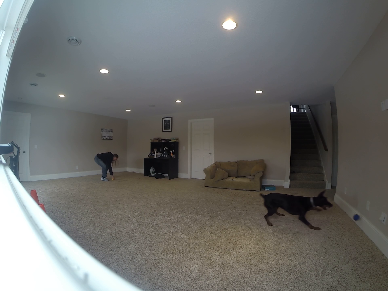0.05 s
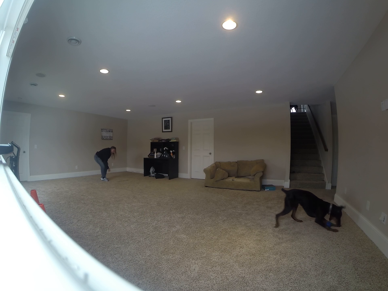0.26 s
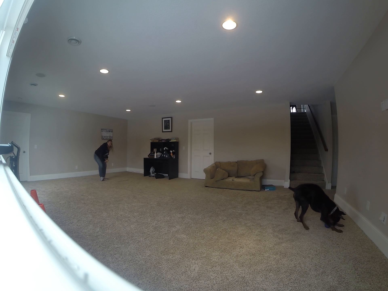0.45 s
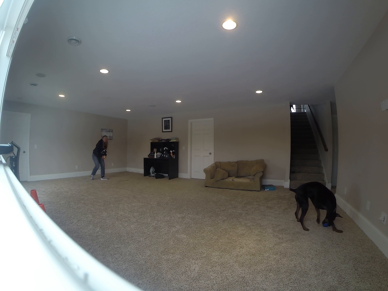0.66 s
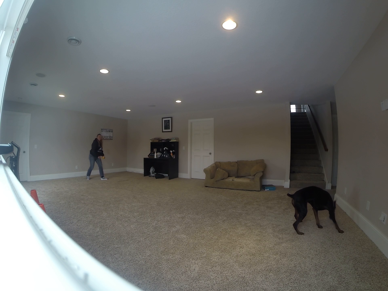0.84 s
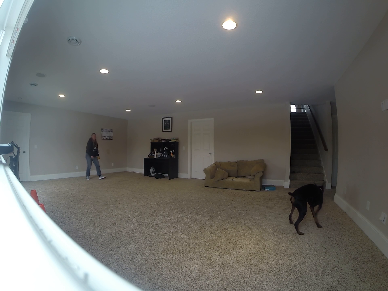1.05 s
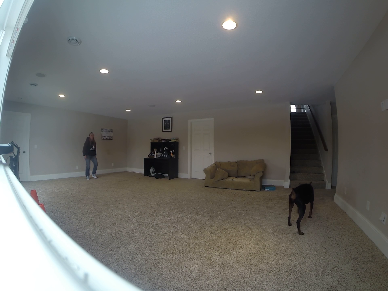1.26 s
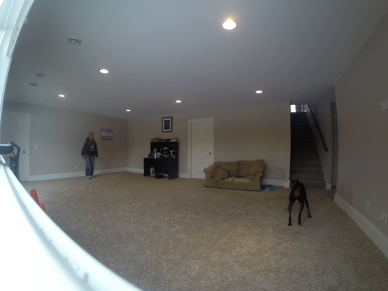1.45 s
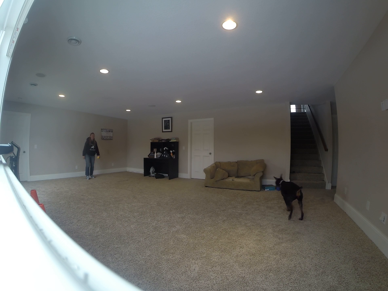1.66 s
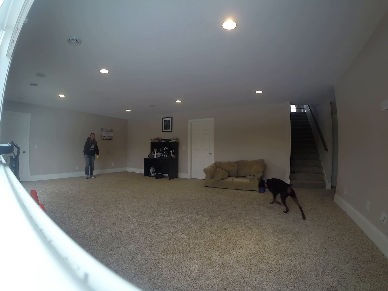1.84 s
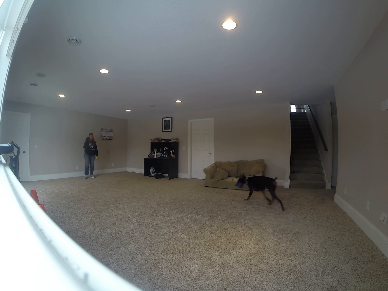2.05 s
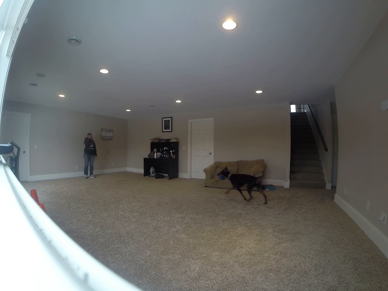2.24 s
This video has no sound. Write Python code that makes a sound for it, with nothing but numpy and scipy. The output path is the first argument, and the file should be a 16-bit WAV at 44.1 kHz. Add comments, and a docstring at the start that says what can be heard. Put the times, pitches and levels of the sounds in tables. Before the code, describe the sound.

In a quiet basement, a ball hits the wall with one loud, briefly echoing thump. A dog's paws slide over the carpet, thud to a stop, then pad away with light scuffs and faint ticks.

```python
"""A dog chases a ball

A thrown rubber ball slaps a hollow basement wall, which booms; the far walls throw the boom back.
A dog skids after it over the carpet, lands with a duller thud, then trots off on soft paws,
with a few faint ticks from its claws or collar. The room is quiet otherwise."""
import sys
import numpy as np
from scipy import signal
from scipy.fft import rfft, irfft, next_fast_len
from scipy.io import wavfile
from scipy.ndimage import uniform_filter1d, minimum_filter1d

SR = 44100
rng = np.random.default_rng(int(sys.argv[2]) if len(sys.argv) > 2 else 0)


def to_wav(sig):
    """Store sig (one row per channel, or 1-D mono) as 16-bit WAV at the path in sys.argv[1].

    Samples outside -1..1 are clipped; the rate is SR.
    """
    pcm = np.clip(np.atleast_2d(sig), -1, 1) * 32767
    pcm = np.round(pcm).astype(np.int16)
    wavfile.write(sys.argv[1], SR, pcm.T)  # frames by channels


N = 101429

# A colour says how strong a noise is from low to high. Each row: frequency in Hz, relative level in dB.
ROOM_COLOUR = [(15, -17), (25, 7.5), (167, -2), (309, -10), (488, -9.5), (1030, -17.5), (1150, -16.5),
               (1760, -21.5), (1910, -19), (2240, -20.5), (2930, -21), (4040, -23.5), (10900, -36.5),
               (13800, -40.5), (15000, -37)]  # the still room
SCUFF_COLOUR = [(50, -11), (200, -3.5), (400, 3), (680, 0.5), (800, -1.5), (920, -0.5), (1300, -1.5),
                (1520, -6.5), (1800, -5), (2300, -15), (3300, -12), (4000, -18), (4450, -19.5),
                (5200, -19.5), (7000, -27), (10000, -31.5), (15000, -47)]  # a paw brushing the carpet
SKID_COLOUR = [(35, -59.5), (60, -21.5), (97, -18), (135, -8), (174, -7), (251, 0.5), (339, -1), (381, -1),
               (577, -5), (744, -2.5), (1240, -13), (1330, -10.5), (1420, -17), (1830, -13.5),
               (2310, -23.5), (3420, -21.5), (15000, -56.5)]  # paws ploughing through the carpet
FIBRE_COLOUR = [(1500, -19), (3300, 6), (7000, -3.5), (11000, -12.5), (15000, -25)]  # bristling carpet fibres
THUD_COLOUR = [(22, -23), (33, -12), (47, -2.5), (62, -2.5), (100, -0.5), (180, -2), (300, -0.5), (400, -7),
               (550, -19.5), (900, -23.5), (2000, -70), (5000, -65.5)]  # the floor under the dog's weight
SLAP_COLOUR = [(300, -8), (1000, 3), (1400, -3), (2200, -26), (2800, 4.5), (3900, 0), (5000, -11.5),
               (8000, -18), (14000, -38)]  # rubber hitting the wall
BOOM_TAIL_COLOUR = [(25, -32), (45, -6.5), (110, 5), (200, 5), (340, -2.5), (480, -5.5), (700, -22),
                    (1200, -38), (2500, -68)]  # the boom lingering in the room

# Claw or collar ticks. Each row: start in seconds, level in dB, pitch in Hz, metallic ping level in dB.
CLAW_TICKS = [(0.612, -46.5, 3860, -68), (1.037, -50, 2820, -55), (1.22, -51, 3520, -64),
              (1.264, -59, 4200, -67), (1.2845, -54.5, 5000, -53.5), (1.649, -53, 3370, -53.5)]
# Paws brush the carpet. Each row: peak time in seconds, level in dB, rise in seconds,
# fade in seconds, treble boost in dB. A fade is always the time a sound takes to drop by 60 dB.
PAW_SCUFFS = [(0.333, -39.5, 0.03, 0.32, -2.5), (.39, -39.5, .06, 0.55, -5),
              (0.594, -53.5, 0.035, 0.53, -1), (.825, -59, 0.075, .3, 8), (0.884, -53.5, 0.074, 0.98, 2),
              (1.15, -55.5, 0.032, 0.33, -10), (1.23, -59.5, 0.052, 0.87, 6), (1.5, -64.5, 0.074, 0.47, -6),
              (1.722, -59, 0.065, 0.79, 7), (1.907, -54, 0.059, 0.68, 7), (2.13, -59, 0.06, 1, 6),
              (2.3, -56, 0.0092, .3, -17)]
# The skid swells and dies away. Each row: time in seconds, level in dB.
SKID_LEVELS = [(0, -34), (.03, -33.5), (.065, -31), (.11, -34.5), (.15, -33.5), (.2, -38.5), (.29, -40.5),
               (.45, -52), (.6, -63), (.7, -110)]
# The dog's footfalls. Each row: start in seconds, level in dB, fade in seconds, bass boost in dB.
PAW_THUDS = [(0.316, -17, 0.3, 3), (0.371, -27, 0.14, -38), (0.431, -30.5, 0.21, -14.5),
             (0.514, -42.5, 0.72, 9.5), (0.717, -48.5, .3, 24), (0.798, -52, 0.22, 17),
             (0.939, -71, 0.18, 12), (1.135, -52.5, 0.72, 0), (1.195, -55, 0.25, 9), (1.414, -57, 0.11, 2),
             (1.474, -51.5, 0.18, 2), (1.705, -55.5, 0.31, 15), (1.915, -52, 0.4, 13), (2.14, -46, 0.2, 12)]
# The ball's slap on the wall: three quick smacks heard as one.
# Each row: delay from the hit in seconds, level in dB.
BALL_SLAPS = [(-.0004, -24), (.0052, -22), (.018, -31)]
# Tones of the air inside the ball. Each row: pitch in Hz, level in dB, fade in seconds.
BALL_AIR_TONES = [(1270, -19.5, 0.032), (1396, -29, 0.041)]
# Tones of the hollow wall. Each row: pitch in Hz, relative level in dB, fade in seconds.
WALL_TONES = [(46.15, -40.5, 1), (57.1, -26.5, 0.81), (98.35, -16.5, 0.48), (147.6, -6, .2),
              (165.8, -4.5, .16), (184.6, -1, 0.11), (245.3, -16.5, 0.22), (302.2, -17, 0.26),
              (319.6, -5, 0.077)]
# The room throws the boom back. Each row: delay in seconds, level in dB compared with the direct boom.
ROOM_ECHOES = [(0.0117, -8), (0.0342, -10.5), (0.0596, -6.5), (0.105, -10)]

BALL_HIT_S = .136
CARPET_GRAIN_DB, GRAINS_PER_S = 1, 230  # the carpet catches and lets go


def amp(db):
    """Turn decibels into a number to multiply a sound by."""
    return 10 ** (np.asarray(db) / 20)


def clock():
    """The time of every sample, in seconds."""
    return np.arange(N) / SR


def filtered(x, gain_at):
    """Scale each frequency in x by gain_at(frequency in Hz)."""
    size = next_fast_len(N + 8192)
    return irfft(rfft(x, size) * gain_at(np.fft.rfftfreq(size, 1 / SR)), size)[:N]


def noise(colour, grain_db=0):
    """Noise of strength 1 in the given colour; grain_db makes its level flutter."""
    hz, db = np.transpose(colour)
    flutter = np.interp(clock() * GRAINS_PER_S, np.arange(N), rng.standard_normal(N))
    hiss = amp(grain_db * flutter) * rng.standard_normal(N)
    x = filtered(hiss, lambda f: amp(np.interp(np.log(f + 1), np.log(hz), db)))
    return x / x.std()


def boosted(colour, db, corner_hz, treble):
    """A colour with its treble or its bass raised by db (lowered if db is negative)."""
    hz, level = np.transpose(colour)
    treble_share = 1 / (1 + (corner_hz / hz) ** 4)
    return np.column_stack([hz, level + db * (treble_share if treble else 1 - treble_share)])


def struck(start, rise_s, fade_s):
    """The loudness of a blow over time: it rises quickly, then dies away."""
    age = np.maximum(clock() - start, 0)
    return (1 - np.exp(-age / rise_s)) * amp(-60 * age / fade_s)


def ring(tones, start, rise_s):
    """Pure tones that start together, each fading at its own speed."""
    return sum(amp(db) * struck(start, rise_s, fade_s) * np.sin(2 * np.pi * hz * (clock() - start))
               for hz, db, fade_s in tones)


def still_room():
    """The quiet room gives a faint, steady rumble and hiss."""
    return amp(-56) * noise(ROOM_COLOUR)


def claw_ticks():
    """Claws or collar make tiny hard clicks, each with a short ping and a faint tail in the room."""
    out = np.zeros(N)
    width = 2 ** 0.78  # 0.78 octaves to each side of the pitch
    for start, db, hz, ping_db in CLAW_TICKS:
        colour = [(hz / 4, -30), (hz / width, -10), (hz, 0), (hz * width, -10), (hz * 4, -25)]
        click = struck(start, rise_s=0.00082, fade_s=0.012)
        tail = amp(-21) * struck(start, rise_s=0.0035, fade_s=.35)
        ping = ring([(hz, ping_db, 0.028)], start, rise_s=0.00082)
        out += amp(db) * (click + tail) * noise(colour) + ping
    return out


def paw_scuffs():
    """Each paw brushes the carpet with a swish that swells, then fades into the room."""
    t, out = clock(), np.zeros(N)
    for peak_s, db, rise_s, fade_s, treble_db in PAW_SCUFFS:
        swell = np.exp(-(np.minimum(t - peak_s, 0) / rise_s) ** 2)
        fade = amp(-60 * np.maximum(t - peak_s, 0) / fade_s)
        colour = boosted(SCUFF_COLOUR, treble_db, corner_hz=2200, treble=True)
        out += amp(db) * swell * fade * noise(colour, CARPET_GRAIN_DB)
    return out


def paw_skid():
    """Braking paws rush over the carpet; its fibres hiss most at the start, while the paws are fast."""
    level_db = np.interp(clock(), *np.transpose(SKID_LEVELS))
    rush = amp(level_db) * noise(SKID_COLOUR, CARPET_GRAIN_DB)
    fibres = amp(-45) * struck(0, rise_s=0.0015, fade_s=0.62) * noise(FIBRE_COLOUR, CARPET_GRAIN_DB)
    return rush + fibres


def paw_thuds():
    """The dog's weight comes down on the carpeted floor in dull thuds that die away in the room."""
    out = np.zeros(N)
    for start, db, fade_s, bass_db in PAW_THUDS:
        colour = boosted(THUD_COLOUR, bass_db, corner_hz=170, treble=False)
        out += amp(db) * struck(start, rise_s=0.0039, fade_s=fade_s) * noise(colour)
    return out


def ball_slap():
    """Rubber smacks the painted wall, and the air in the ball pings just after."""
    smack = sum(amp(db) * struck(BALL_HIT_S + delay, rise_s=0.00089, fade_s=0.011)
                for delay, db in BALL_SLAPS)
    ping = ring(BALL_AIR_TONES, BALL_HIT_S + 0.00368, rise_s=0.0011)
    return smack * noise(SLAP_COLOUR) + ping


def wall_boom():
    """The hit makes the hollow wall ring low; echoes and a rumbling tail follow."""
    t = clock()
    direct = ring(WALL_TONES, BALL_HIT_S, rise_s=0.0069)
    echoes = sum(amp(db) * np.interp(t - delay, t, direct) for delay, db in ROOM_ECHOES)
    tail = amp(-18.5) * struck(BALL_HIT_S, rise_s=0.02, fade_s=0.61) * noise(BOOM_TAIL_COLOUR)
    return amp(2) * (direct + echoes + tail)


def scene():
    """Add the ball, the dog and the still room into one channel."""
    ball = wall_boom() + ball_slap()
    dog = paw_thuds() + paw_skid() + paw_scuffs() + claw_ticks()
    return (ball + dog + still_room())[None]


def record(dry):
    """The microphone drops the deepest bass and highest treble; the level dips briefly on loud peaks."""
    low_cut_hz, top_hz, peak_limit = 26.6, 15200, .88
    x = signal.sosfilt(signal.butter(2, low_cut_hz, "highpass", fs=SR, output="sos"), dry[0])
    window = int(.008 * SR)  # smooth each dip over 8 milliseconds
    needed_gain = peak_limit / np.maximum(np.abs(x), peak_limit)
    smooth_gain = uniform_filter1d(minimum_filter1d(needed_gain, window), window)
    return filtered(smooth_gain * x, lambda hz: hz < top_hz)[None]


dry = scene()
out = record(dry)
to_wav(out)
```